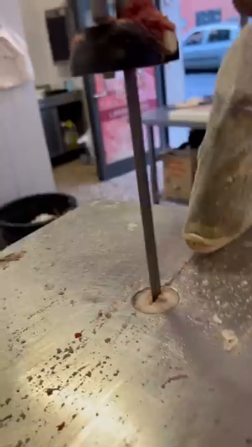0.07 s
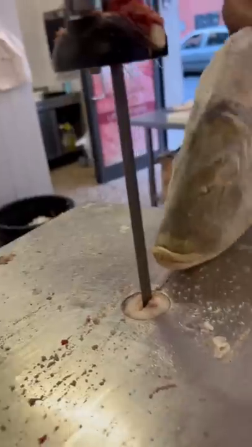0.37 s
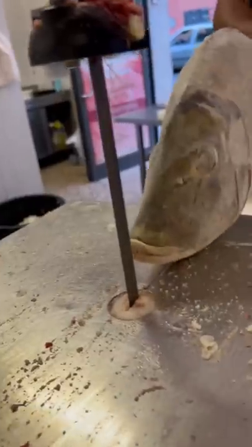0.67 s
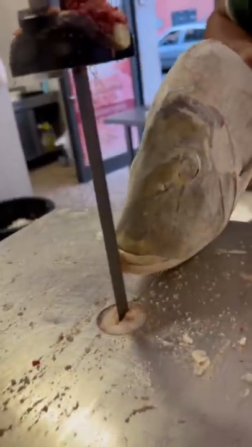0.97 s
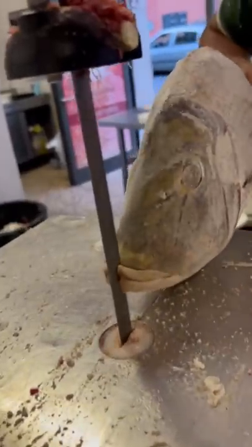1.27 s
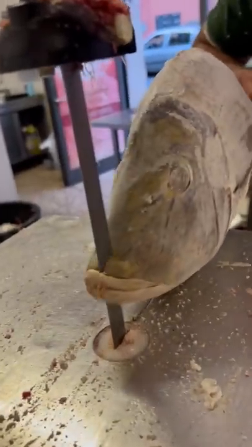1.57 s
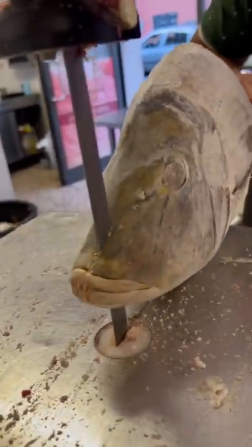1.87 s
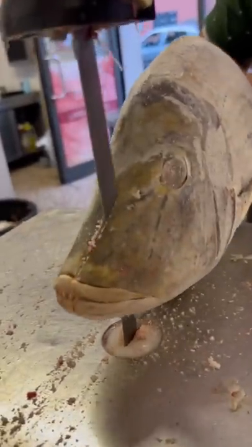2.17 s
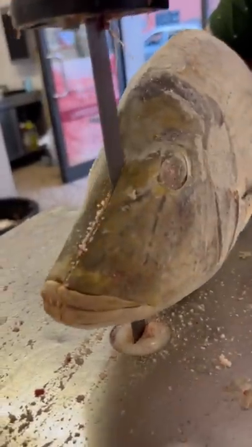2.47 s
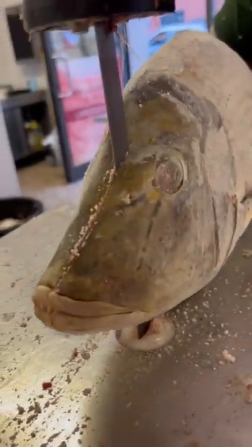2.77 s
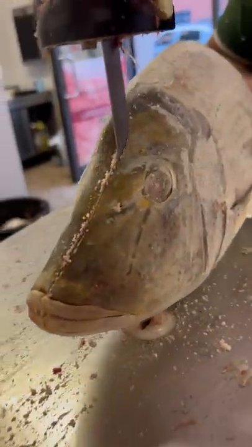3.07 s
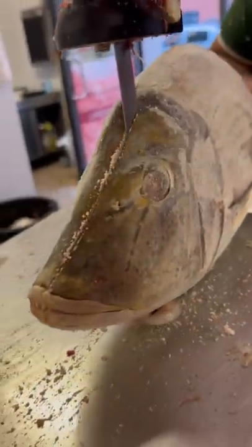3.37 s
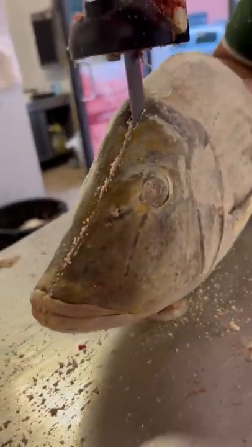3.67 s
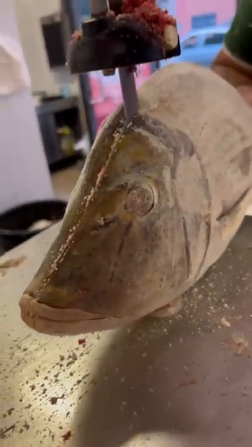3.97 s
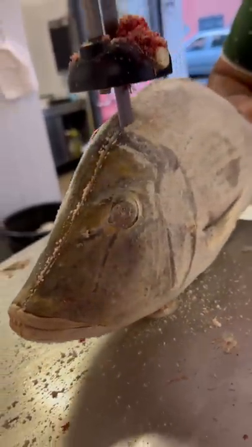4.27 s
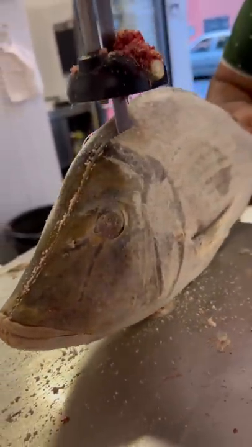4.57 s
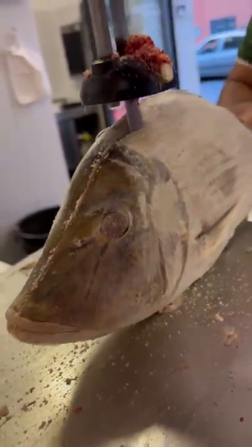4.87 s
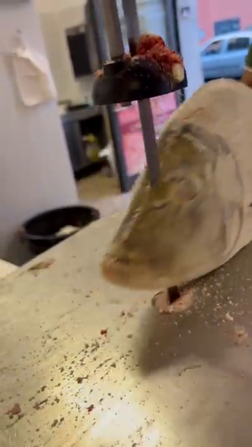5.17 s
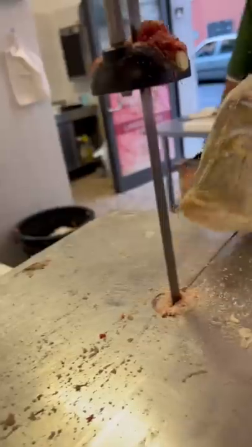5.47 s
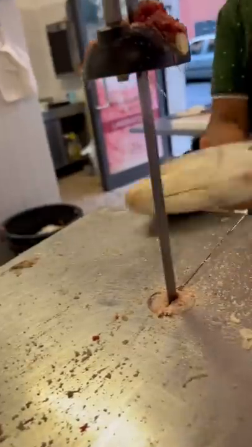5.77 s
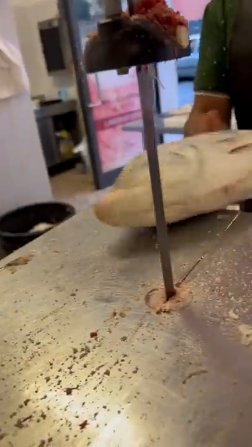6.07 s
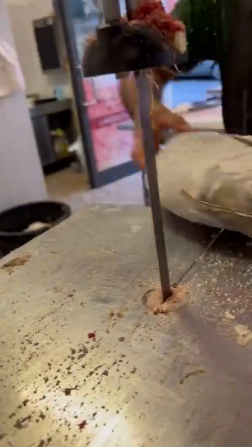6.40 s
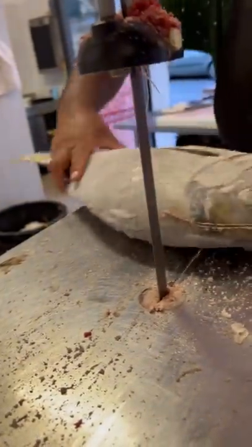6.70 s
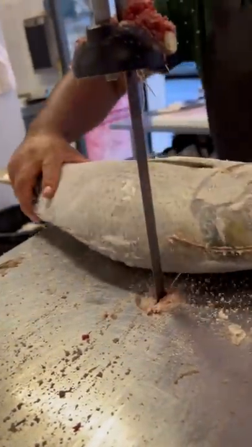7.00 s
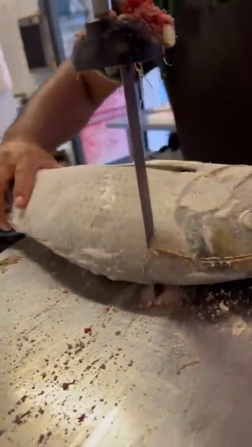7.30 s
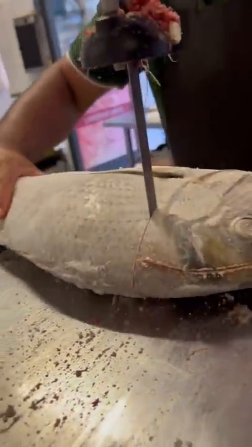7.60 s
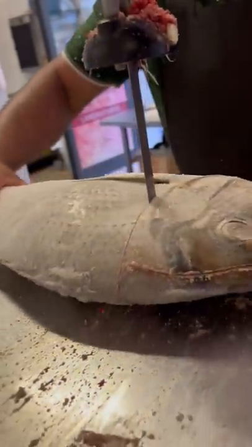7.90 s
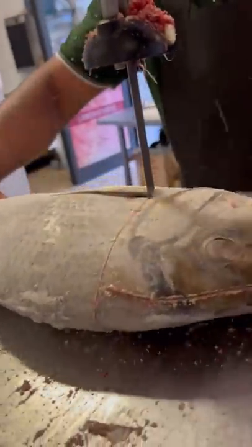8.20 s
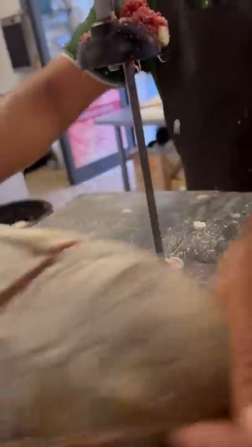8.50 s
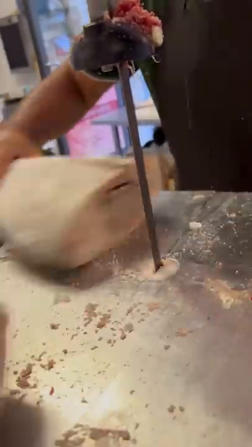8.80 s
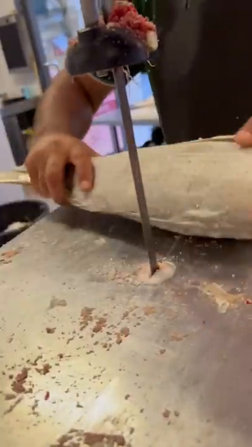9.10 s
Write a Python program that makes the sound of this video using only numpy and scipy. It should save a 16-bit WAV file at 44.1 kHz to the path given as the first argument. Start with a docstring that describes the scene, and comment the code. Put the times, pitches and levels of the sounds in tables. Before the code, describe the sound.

A bandsaw idles close by in a small shop, with a steady motor drone and low rumble. At about 1 second the blade bites into a hard frozen fish with a dull knock and a loud, gritty, buzzing rasp. From about 1.5 to 4.8 seconds the pinched blade squeals in wavering high tones, and the buzz sags slightly in pitch as it crunches through ice and bone. The cut fades out by about 5.3 seconds, leaving the quieter hum and a few faint ticks of ice crumbs on steel. A second, shorter cut runs from 7 to about 8.4 seconds, hissing and rasping with brief whistles and a crunchier finish. The saw returns to idle, its blade ringing faintly. One more crumb ticks, and just after 9 seconds the fish bumps twice on the steel table with a short clatter.

```python
"""A butcher's bandsaw drones in a small shop, then rasps twice through a hard frozen fish.
The teeth strike almost 900 times a second and slow under load, tearing through ice and bone.
Deep in the first cut the kerf pinches the blade and friction makes it squeal.
Between the cuts the frame drones and ice crumbs tick; at last the fish bumps down on the steel table."""
import sys
import numpy as np
from scipy import signal
from scipy.fft import rfft, irfft, next_fast_len
from scipy.io import wavfile
from scipy.ndimage import uniform_filter1d, map_coordinates

SR = 44100
rng = np.random.default_rng(int(sys.argv[2]) if len(sys.argv) > 2 else 0)


def persist_wave(psi):
    """Save psi, clipped to +-1, as 16-bit WAV."""
    counts = np.round(np.clip(psi, -1, 1) * 32767).astype(np.int16)
    wavfile.write(sys.argv[1], SR, np.atleast_2d(counts).T)


N = 407925
T = np.arange(N) / SR
FFT_SIZE = next_fast_len(N)
BINS_HZ = np.maximum(np.arange(FFT_SIZE // 2 + 1) * SR / FFT_SIZE, 1)
IDLE_TOOTH_HZ = 899.3

# blade speed, one curve a cut: time_s, tooth_rate_hz
TOOTH_RATE = [
    [(.95, 895), (1.25, 882), (1.5, 867), (2, 856), (2.7, 859), (3, 845), (4, 832), (4.68, 833),
     (4.95, 888)],
    [(7, 895), (7.2, 870), (7.6, 848), (8.1, 845), (8.3, 830)],
]
# teeth in the fish: start_s, end_s, tone_over_grit_db (at idle speed)
CUTS = [(0.917, 5.32, 4.5), (6.967, 8.355, 7)]
# feed force and what the teeth meet, one curve a cut: time_s, feed_db, crunch_db, spray_db
FEED = [
    [(0.95, -37, -2, 8), (1.14, -26, -7, 1), (1.25, -30, -7, 8), (1.72, -25, -9, 3), (2.12, -25, -6, 3),
     (2.78, -26, -11, 3), (3.55, -21, -13, -4), (4.04, -26, -8, -2), (4.09, -19, -17, -10),
     (4.11, -26, -9, -3), (4.24, -28, -12, -2), (5.3, -40, -4, 4)],
    [(7.02, -40, -12, 5), (7.048, -41, -3, 9), (7.224, -41, -13, 8), (7.686, -32, -6, 3),
     (7.77, -31, -13, 4), (7.814, -36, -7, 4), (8.08, -34, 5, 2), (8.246, -40, 0, 7), (8.33, -33, -10, -1)],
]


def from_db(db):
    """Decibels to gain."""
    return 10 ** (np.asarray(db) / 20)


def unit_rms(x):
    """Scale to rms 1."""
    return x / np.sqrt(np.mean(x ** 2) + 1e-20)


def in_time(rows):
    """Each column of a curve at every sample."""
    time_s, *columns = np.transpose(rows)
    return [np.interp(T, time_s, column) for column in columns]


def in_bins(rows, column=1):
    """One column of a spectrum at every bin, interpolated in log frequency."""
    columns = np.transpose(rows)
    return np.interp(np.log(BINS_HZ), np.log(columns[0]), columns[column])


def drift(rate_hz):
    """Smooth random wander, rms 1."""
    step, settle = 40, 2000
    pole = np.exp(-2 * np.pi * step * rate_hz / SR)
    white = rng.standard_normal(N // step + settle + 2)
    slow = signal.lfilter([1], [1, -2 * pole, pole * pole], white)[settle:]
    return np.interp(np.arange(N) / step, np.arange(len(slow)), unit_rms(slow))


def band(x, low_hz, high_hz, order=4):
    """Butterworth band-pass."""
    sos = signal.butter(order, [low_hz, min(high_hz, .45 * SR)], "band", fs=SR, output="sos")
    return signal.sosfilt(sos, x + 1e-18)


def resonances(modes):
    """Gain per bin of steep-sided resonances."""
    return np.sqrt(sum((from_db(db) / (1 + ((BINS_HZ - hz) / half_width_hz) ** 2)) ** 2
                       for hz, half_width_hz, db in modes))


def noise(colour, force=1):
    """Stereo noise, modulated by force, filtered by colour; rms near 1."""
    # left-right likeness: freq_hz, correlation
    likeness = [(100, 1), (400, 1), (600, .72), (2000, 0.77), (2800, 0.33), (4000, 0.92), (5200, 0.65),
                (6800, 0.47), (12500, 1), (15000, 1)]
    alike = np.clip(in_bins(likeness), -1, 1)
    mid, side = rfft(force * rng.standard_normal((2, N)), FFT_SIZE) * colour
    mid, side = irfft([mid * np.sqrt(1 + alike), side * np.sqrt(1 - alike)], FFT_SIZE)[:, :N]
    return np.array([mid + side, mid - side]) / np.std(mid)


def struck(start_s, t60_s):
    """Jump to 1, then exponential decay."""
    return (T >= start_s) * from_db(-60 * np.clip((T - start_s) / t60_s, 0, 4))


def swell(centre_s, length_s):
    """Parabolic rise and fall."""
    return np.clip(1 - (2 * (T - centre_s) / length_s) ** 2, 0, 1)


def engaged(loss_db_per_s=0, attack_s=0.028, t60_s=0.081):
    """One gain a cut: opens on contact, sinks at the given rate, rings out."""
    return [np.clip((T - start_s) / attack_s, 0, 1)
            * from_db(-loss_db_per_s * np.maximum(T - start_s, 0))
            * from_db(-60 * np.clip((T - end_s) / t60_s, 0, 4))
            for start_s, end_s, _ in CUTS]


def hum(waver=0.00282):
    """Motor and wheels hum on slightly wavering tones."""
    # hum tones: pitch_hz, level_db
    tones = [(92, -59.5), (139.4, -65), (201, -60), (215.3, -54), (372, -48.5), (410, -51.5), (694, -61),
             (828, -66)]
    out = 0
    for hz, db in tones:
        cycles = hz * np.cumsum(1 + waver * drift(2.69)) / SR
        out += np.sqrt(2) * from_db(db) * np.sin(2 * np.pi * cycles)
    return out


def steel_table(swing_db, damping_db_per_s=8.5):
    """Motor and teeth shake the table, the teeth less as the blade sinks in."""
    # table modes: freq_hz, half_width_hz, gain_db
    modes = [(838.4, 36, 17), (796, 59, 1)]
    feed_db = in_time(np.vstack(FEED))[0]
    idling = from_db(-46.5 + 0.44 * swing_db)
    sawing = sum(engaged(damping_db_per_s)) * from_db(feed_db - 4)
    return np.hypot(idling, sawing) * noise(resonances(modes))


def machine(wheel_hz=8.8, flap_hz=47.1):
    """Motor and wheels shake frame and table; the blade sings in its guides."""
    # strength of the shaking: time_s, drone_db, rumble_db
    shake = [(0.1, -36, -45.5), (0.27, -37.5, -46), (0.99, -33.5, -51), (1.54, -31, -42.5),
             (3.39, -38.5, -49), (4.84, -44, -63), (6.28, -42.5, -57), (6.63, -46, -57), (8.35, -37, -55.5),
             (9.05, -37, -53)]
    # frame and guide modes: freq_hz, half_width_hz, gain_db
    frame_modes = [(219.4, 25, -9.5), (242, 39, -10.5), (363, 35, -2.5), (378.7, 11.1, 3.5),
                   (401.6, 5, 3.5), (491, 59, -6.5), (566, 20, -14.5)]
    guide_modes = [(1326, 39, 2), (1694, 115, 0.5), (1994, 18, 5), (2225, 250, -3), (3075, 51, 7.5),
                   (3250, 104, -2.5), (4840, 180, -8.5), (5840, 220, -10), (6980, 550, -13.5)]
    # rumble and broad running noise: freq_hz, density_db
    rumble_spectrum = [(22, -24), (35, -6), (48, 1.5), (70, 2.5), (135, 1), (300, -21), (600, -23),
                       (1200, -96)]
    shop_spectrum = [(40, -38), (200, 3.5), (500, -4.5), (630, -4), (950, -0.5), (1150, -4), (1700, -14.5),
                     (3600, -11), (6000, -20), (9000, -19.5), (12000, -27.5), (14500, -17.5)]
    drone_db, rumble_db = in_time(shake)
    swing_db = drone_db - drone_db.mean()
    running = from_db(-45 + 0.47 * swing_db)
    throb = 1 + 0.086 * np.sin(2 * np.pi * wheel_hz * T)  # wheel imbalance
    flap = 1 + 0.18 * np.sin(2 * np.pi * flap_hz * T)
    rumble = from_db(rumble_db + 3) * noise(from_db(in_bins(rumble_spectrum)))
    frame = from_db(drone_db + 1) * throb * noise(resonances(frame_modes))
    table = steel_table(swing_db)
    guides = running * flap * noise(resonances(guide_modes))
    shop = running * noise(from_db(in_bins(shop_spectrum)))
    return rumble + frame + table + guides + shop + hum()


def crumbs(t60_s=0.18, gain_db=-10):
    """Bits of ice tick brightly on the steel."""
    # crumb impacts: start_s, level_db
    ticks = [(5.672, -38), (6.1399, -32), (6.2894, -33), (6.3294, -38), (6.3594, -48), (6.6594, -38),
             (8.853, -28.5)]
    envelope = sum(from_db(db + gain_db) * struck(start_s, t60_s) for start_s, db in ticks)
    return envelope * unit_rms(band(rng.standard_normal((2, N)), 3700, 11000, order=2))


def bumps(t60_s=0.029, clatter=0.51, gain_db=-2):
    """The heavy fish knocks dully and the table clatters."""
    # fish impacts: start_s, level_db, pitch_hz
    impacts = [(1.175, -21, 369), (9.072, -18, 262), (9.082, -20, 231), (9.228, -16.5, 606),
               (9.237, -20, 514)]
    out = 0
    for start_s, db, hz in impacts:
        knock = struck(start_s, t60_s) * np.sin(2 * np.pi * hz * (T - start_s))
        rattle = unit_rms(band(rng.standard_normal(N), hz / 2, 2 * hz, order=3))
        out += from_db(db + gain_db) * (knock + clatter * struck(start_s, 2 * t60_s) * rattle)
    return out


def ringing():
    """Blade or table rings on one resonance: short squeals, a drone under the fish, the freed blade."""
    # single resonances: centre_s, length_s, freq_hz, width_hz, level_db
    rings = [(1.256, 0.79, 3090, 150, -35.5), (1.285, 0.054, 8800, 67, -22), (1.34, 0.27, 823, 67, -25.5),
             (1.73, .1, 1525, 25, -32.5), (3.465, 0.39, 3186, 70, -24), (4.825, .12, 826, 46, -32),
             (7.058, .16, 889, 18.3, -36), (7.8, 1.38, 240, 39, -44), (8.041, 0.63, 3326, 79, -32.5),
             (8.6, 0.39, 880, 100, -40), (8.85, 1.08, 3200, 260, -47.5)]
    out = np.zeros(N)
    for centre_s, length_s, hz, width_hz, db in rings:
        envelope = swell(centre_s, length_s)
        live = np.flatnonzero(envelope)
        white = rng.standard_normal(SR // 4 + len(live))
        ring = band(white, hz - width_hz / 2, hz + width_hz / 2, order=2)[-len(live):]
        out[live] += from_db(db) * envelope[live] * unit_rms(ring)
    return out


def squeal(surge, start_s=1.45, end_s=4.78, fade_s=0.17, slip_db=-12, slip_hz=6.1):
    """The pinching kerf keeps the blade's modes ringing; they dip whenever the grip slips."""
    # blade modes: freq_hz, half_width_hz, gain_db
    low_modes = [(1511.6, 11.5, 1), (1575, 90, -16.5)]
    middle_modes = [(3043, 34.5, 3), (3015, 15, -9.5)]
    high_modes = [(6750, 34, -2), (6797, 170, -6)]
    # friction favouring the high modes at the cost of the low: time_s, lean_db
    lean = [(1.62, 2), (1.85, 6.5), (2.15, 3.5), (2.45, 0), (2.95, -5.5), (3.15, 4), (3.35, 5.5),
            (3.6, -1.5), (4.5, -2.5)]
    pinch = np.clip(np.minimum(T - start_s, end_s - T) / fade_s, 0, 1)
    feed_db, lean_db = in_time(np.vstack(FEED))[0], in_time(lean)[0]
    push_db = 0.12 * (feed_db - np.average(feed_db, weights=pinch))
    out = 0
    for modes, db in [(low_modes, -34 - lean_db),
                      (middle_modes, -27.5 + push_db),
                      (high_modes, -27.5 + push_db + lean_db)]:
        ring = noise(resonances(modes))
        power = uniform_filter1d(np.mean(ring ** 2, axis=0), size=700) + 1e-6
        out += from_db(db) * ring / power ** .45  # self-fed vibration levels itself out
    slip = np.cos(2 * np.pi * slip_hz * T) + drift(26) / 2
    return pinch * surge * from_db(slip_db * np.clip(slip - .5, 0, 1)) * out


def whistles(tooth_cycles, waver_db=2):
    """Where every tooth bites alike, one harmonic of the tooth rate comes out clean."""
    # locked harmonics: centre_s, length_s, approx_pitch_hz, level_db
    locks = [(1.27, .4, 4400, -38), (2.285, 0.066, 3430, -22.5), (2.29, 0.072, 4290, -25),
             (7.373, 0.081, 6870, -26), (7.37, 0.11, 8590, -31), (7.466, 0.12, 8560, -26),
             (7.47, 0.1, 5140, -33)]
    out = 0
    for centre_s, length_s, hz, db in locks:
        tooth_hz = np.interp(centre_s, *np.vstack(TOOTH_RATE).T)
        tone = np.sqrt(2) * np.sin(2 * np.pi * np.round(hz / tooth_hz) * tooth_cycles)
        out += from_db(db + waver_db * drift(25)) * swell(centre_s, length_s) * tone
    return out


def tooth_tone(tooth_cycles, flex_db=3.5):
    """Uneven teeth blur the harmonics of their rate, the high ones most."""
    # tooth harmonics: freq_hz, gain_db
    spectrum = [(850, -7.5), (1720, 8.5), (2580, 3.5), (3400, 2.5), (4300, 3.5), (5100, 3), (6900, 3),
                (8600, 2), (9500, 1.5), (11200, 4), (12700, -6), (14000, 3.5)]
    offset_hz = BINS_HZ - IDLE_TOOTH_HZ * np.maximum(np.round(BINS_HZ / IDLE_TOOTH_HZ), 1)
    half_width_hz = 24 + 36 * (BINS_HZ / 7000) ** 2
    comb = 1 / (1 + (offset_hz / half_width_hz) ** 2)
    hz, _, frames = signal.stft(noise(comb * from_db(in_bins(spectrum))), SR, nperseg=512)
    # each harmonic swells by itself as the blade flexes
    harmonic = np.round(hz / IDLE_TOOTH_HZ).astype(int)
    flex = rng.standard_normal((harmonic.max() + 1, frames.shape[-1]))
    flex = unit_rms(uniform_filter1d(flex, size=9))
    pattern = signal.istft(frames * from_db(flex_db * flex[harmonic]))[1]
    position = tooth_cycles * SR / IDLE_TOOTH_HZ  # the pattern plays at blade speed
    return unit_rms(np.array([map_coordinates(ear, [position], order=3, mode="mirror")
                              for ear in pattern]))


def cutting(tooth_hz, tooth_cycles, surge, chip_db=1.5, judder_db=0.16, grain_db=1.28,
            roughen_db_per_hz=.06, muffle_db_per_s=0.06):
    """Each tooth tears off a burst of chips; bone crunches low, ice sprays high."""
    # chip noise: freq_hz, density_db
    grit_spectrum = [(300, -26), (700, -15), (1100, -18), (1600, -0.5), (1900, -4.5), (2150, 0),
                     (2800, -5.5), (3400, -1), (3900, -5.5), (6700, 2.5), (8500, 2.5), (12500, 2.5),
                     (14500, -8)]
    # teeth catching on hard bone: centre_s, length_s, boost_db
    bites = [(1.09, 0.033, 1.5), (1.657, 0.012, 5), (3.907, 0.028, 6), (5.022, 0.12, 3.5),
             (7.622, 0.099, 0), (8.006, .02, 2), (8.285, .02, 3.5), (8.336, 0.038, 4.5)]
    force = (1 + 0.53 * np.cos(2 * np.pi * tooth_cycles)) * from_db(chip_db * drift(500))
    grit = noise(from_db(in_bins(grit_spectrum)), force)
    # the slower the blade, the further its tone sinks into the grit
    roughen_db = roughen_db_per_hz * (IDLE_TOOTH_HZ - tooth_hz)
    tone_gain = sum(gain * from_db(db - roughen_db) for gain, (_, _, db) in zip(engaged(), CUTS))
    teeth = (grit + tone_gain * tooth_tone(tooth_cycles)) / np.hypot(1, tone_gain)
    teeth *= from_db(judder_db * drift(90))
    feed_db, crunch_db, spray_db = in_time(np.vstack(FEED))
    contact = sum(engaged())
    bone = from_db(sum(db * swell(centre_s, length_s) for centre_s, length_s, db in bites))
    shade = sum(engaged(muffle_db_per_s)) / (contact + 1e-9)  # the deepening kerf shades the spray
    crunch = (bone * from_db(crunch_db + 3.2), band(teeth, 546, 2920))
    rasp = (bone * from_db(4.5), band(teeth, 3080, 7980))
    spray = (shade * from_db(spray_db + 2.5), band(teeth, 8880, 19500))
    chips = sum(gain * from_db(grain_db * drift(15.6)) * x / np.std(x.mean(axis=0))
                for gain, x in (crunch, rasp, spray))
    return contact * surge * from_db(feed_db) * chips


def scene(speed_jitter=0.00195, surge_db=1.29):
    """Blade speed sets the tooth rate; uneven feed makes rasp and squeal surge."""
    tooth_hz = in_time(np.vstack(TOOTH_RATE))[0]
    tooth_cycles = np.cumsum(tooth_hz * (1 + speed_jitter * drift(25.76))) / SR
    surge = from_db(surge_db * drift(1.77))
    saw = cutting(tooth_hz, tooth_cycles, surge) + whistles(tooth_cycles) + ringing() + squeal(surge)
    return saw + machine() + crumbs() + bumps()


def record(dry, onset_s=.035, ceiling=1.1, cutoff_hz=15850):
    """Sound sets in after an instant; left and right differ, peaks are rounded, the top is cut."""
    # two microphone ports: freq_hz, left_lead_rad, left_over_right_db
    ports = [(150, 0, 0), (600, .7, 2.2), (1700, 0, 0), (2500, .2, 2), (2900, -.8, 1), (4200, 0, .8),
             (5000, -.4, 1.8), (6500, -1.3, .2), (15000, -1.5, 0)]
    side = np.array([[.5], [-.5]])
    response = np.exp(1j * side * in_bins(ports, 1)) * from_db(side * in_bins(ports, 2))
    stereo = irfft(rfft(dry, FFT_SIZE) * response, FFT_SIZE)[:, :N]
    rounded = ceiling * np.tanh((T > onset_s) * stereo / ceiling)
    return signal.sosfilt(signal.ellip(12, .1, 95, cutoff_hz, fs=SR, output="sos"), rounded)


dry = scene()
out = record(dry)
persist_wave(out)
```